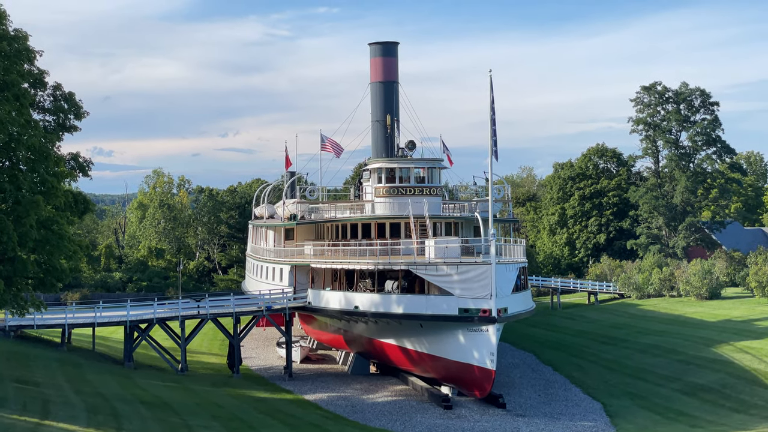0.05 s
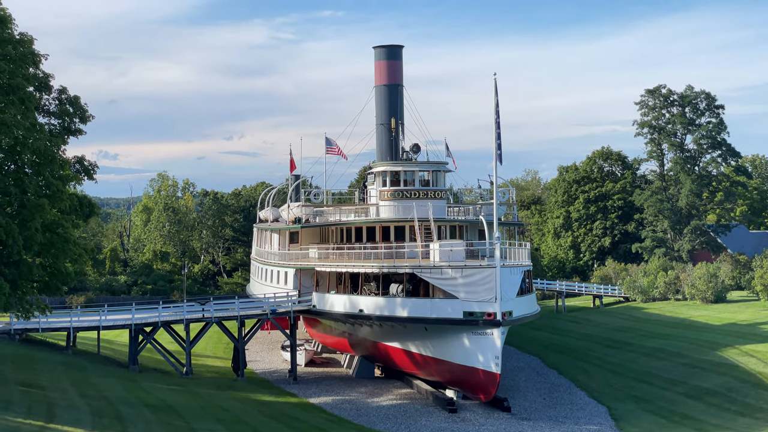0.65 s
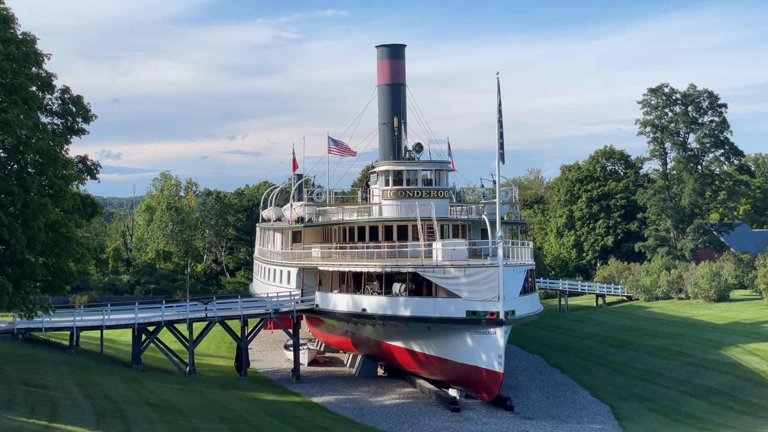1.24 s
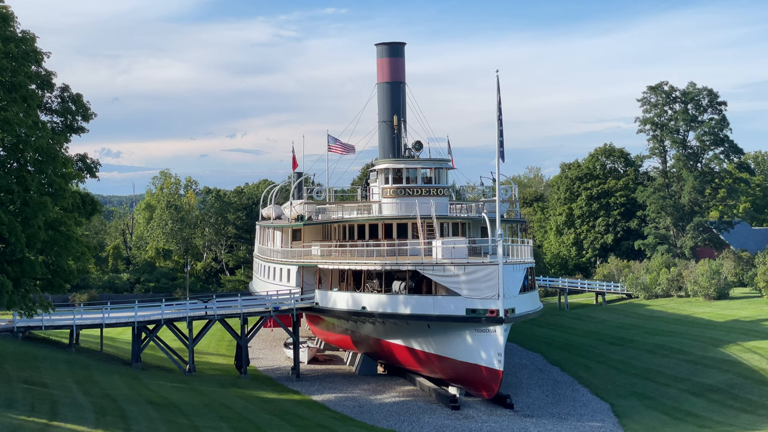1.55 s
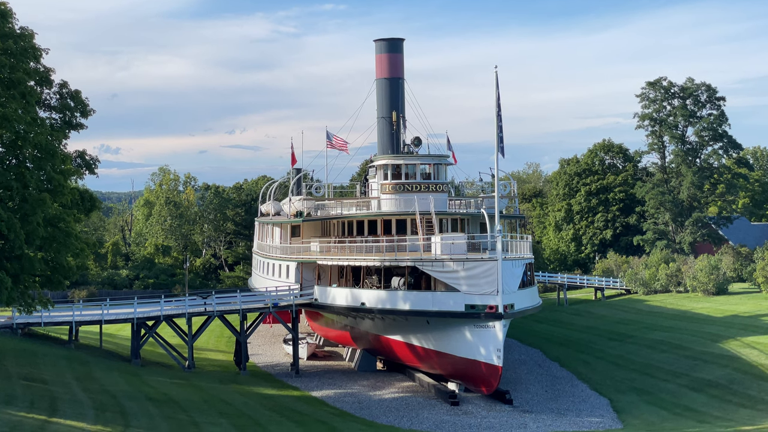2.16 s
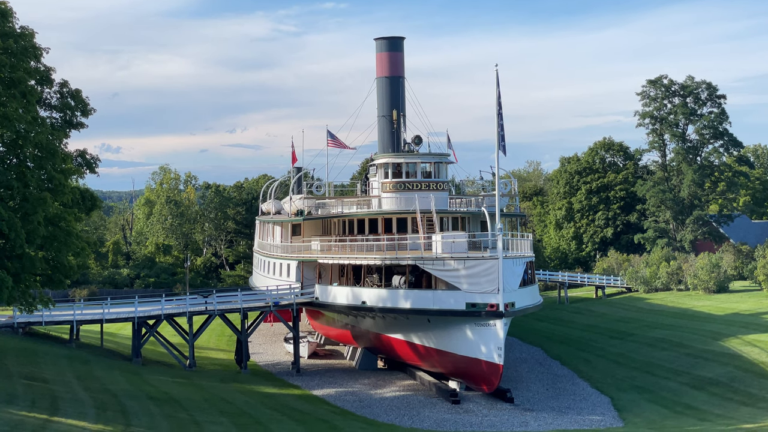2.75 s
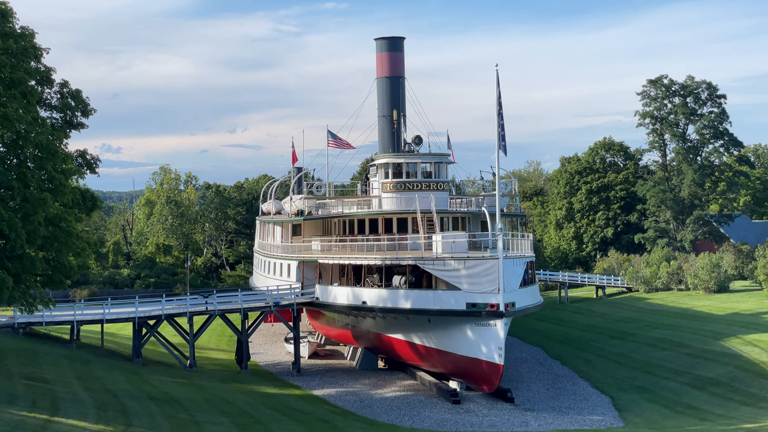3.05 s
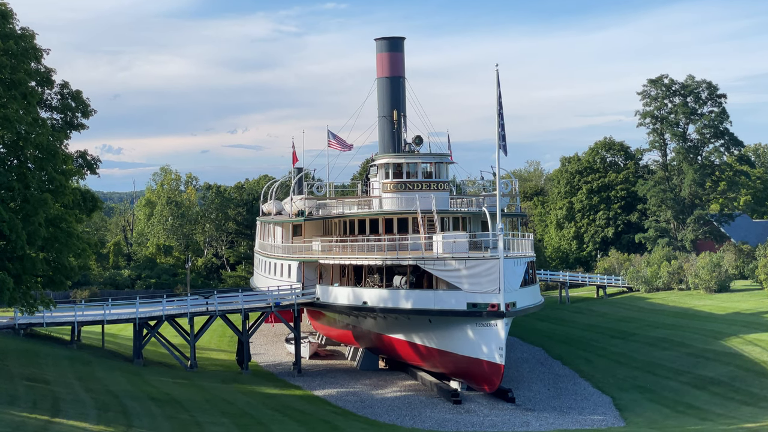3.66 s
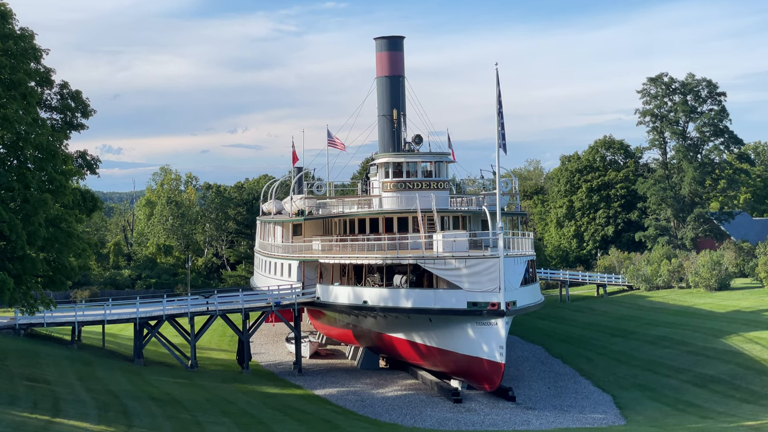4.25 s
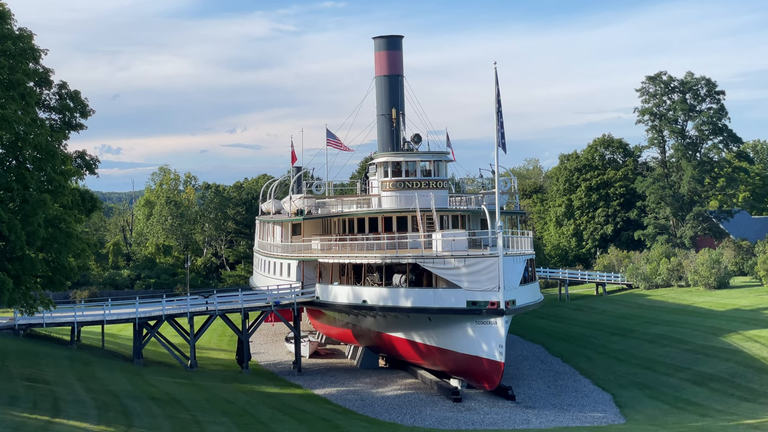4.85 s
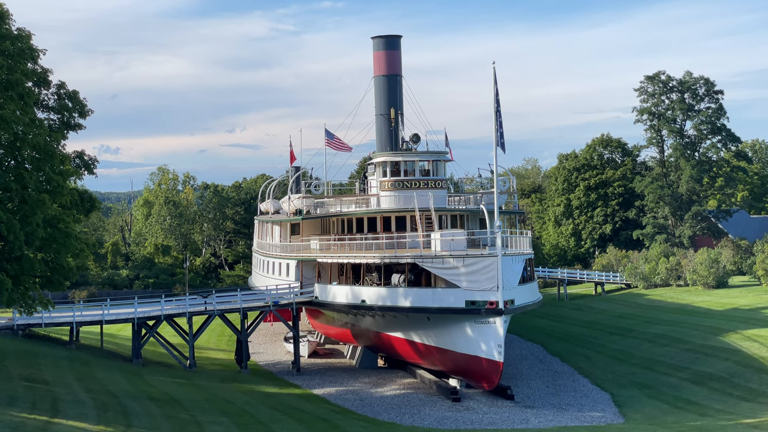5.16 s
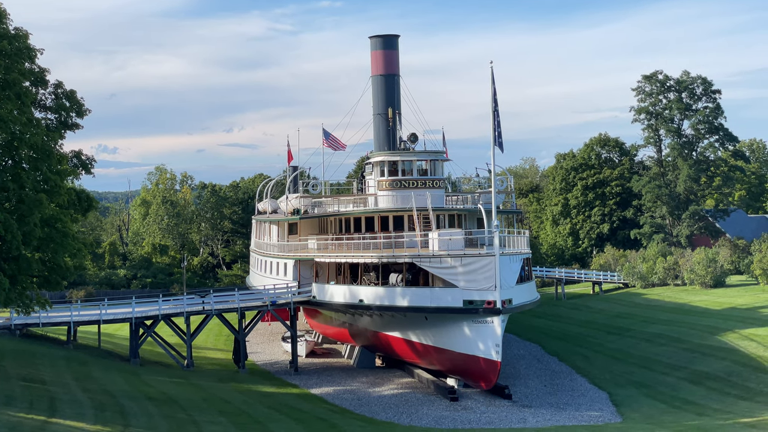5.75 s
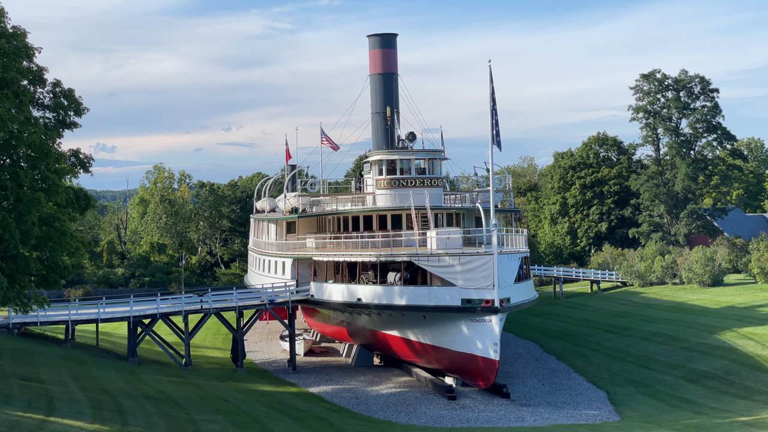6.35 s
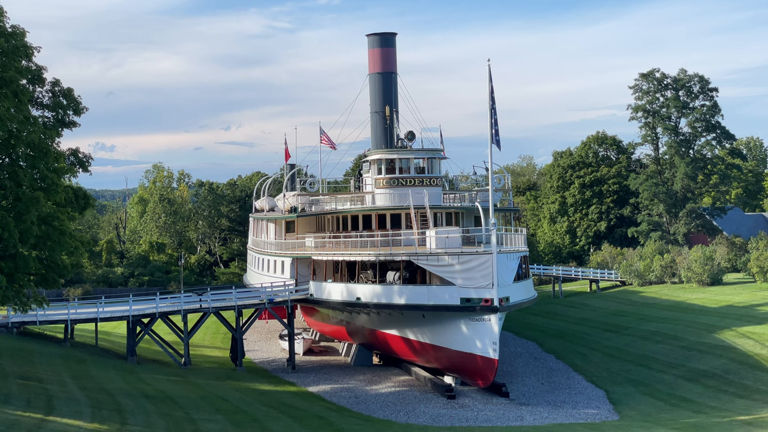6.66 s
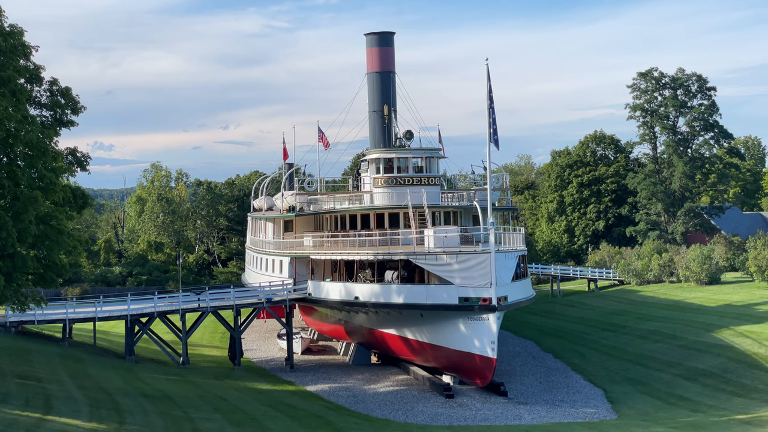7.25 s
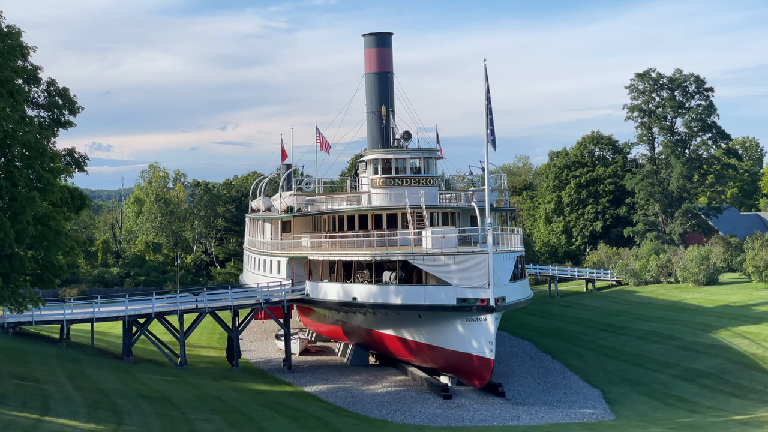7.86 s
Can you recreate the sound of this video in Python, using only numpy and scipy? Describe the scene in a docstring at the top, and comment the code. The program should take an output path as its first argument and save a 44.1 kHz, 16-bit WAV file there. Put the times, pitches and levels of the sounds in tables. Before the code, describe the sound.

From the very start, a steamboat's big whistle is already blowing in an open park: one deep, steady note with a strong low body and weaker overtones, wrapped in a breathy roar and hiss of steam. It is brightest in the first two seconds, then eases slightly as the overtones sink into the rushing steam, while the pitch holds. At about 6.3 seconds the whistle shuts off, and the note and hiss die away within a second. A soft, dull knock comes at about 6.9 seconds. The steam leaves a fading echo, and the low note returns faintly from far trees between 7.1 and 7.6 seconds. From roughly 6.6 seconds to the end at 8 seconds, a few tiny high bird chips and a thin, pulsing cricket are barely audible over a quiet distant rumble and machinery hum.

```python
"""Steam whistle across a park

A steamboat's big whistle, already blowing, holds one deep note: a steam jet drives an air column.
As the pressure sags the overtones sink into the rush of steam. The valve shuts, there is a soft
knock, and the note echoes off far trees. A distant hum, a cricket and a few small birds are left."""
import sys
import numpy as np
from scipy import signal
from scipy.fft import rfft, irfft, next_fast_len
from scipy.io import wavfile

SR = 44100
rng = np.random.default_rng(int(sys.argv[2]) if len(sys.argv) > 2 else 0)


def wrap_up_sound(samples):
    """Save the sound to the file named by the first command line argument, as 16-bit audio."""
    columns = np.atleast_2d(samples).T
    # keep every value between -1 and 1, then stretch to whole-number steps
    tamed = np.clip(columns, -1, 1)
    steps = np.round(tamed * 32767).astype(np.int16)
    wavfile.write(sys.argv[1], SR, steps)


N = 348390
FFT_SIZE = next_fast_len(N)
TIME, FREQS = np.arange(N) / SR, np.fft.rfftfreq(FFT_SIZE, 1 / SR)
SHUT_S = 6.27   # valve starts to close


# Upper air-column harmonics: multiple, level/dB, surge/dB, sag/(dB/s), drop-out/(dB/s)
HARMONICS = [(3, -35, -9, 3.5, -2), (4, -47, 13.5, 0.7, 7.5), (5, -31, -0.9, 2.5, 18),
             (6, -35, 4.5, 2.65, 17.5), (7, -61, 5.5, 1.5, 16), (8, -56, 5.5, 0.5, 16),
             (9, -53, 5, 3.5, 17.5)]

def whistle(phase, octave_db=-34, octave_peak_s=2.15, octave_width_s=3.06, waver_db=1.1):
    """Strong fundamental, weak overtones; most drop out from just before the valve shuts."""
    octave_gain = from_db(octave_db) * .5 ** (((TIME - octave_peak_s) / octave_width_s) ** 2)
    overtones = octave_gain * partial(phase, 2, flutter=0.038)
    failing_s = since(SHUT_S - 0.49)
    for multiple, db, surge_db, sag, dropout in HARMONICS:
        gain = blown(db + waver_db * drift(1) - dropout * failing_s, surge_db, sag)
        overtones += gain * partial(phase, round(multiple), flutter=0.045)
    return fundamental_gain() * partial(phase, 1, flutter=0.0052) + ring_out() * overtones


def whistle_phase(pitch_hz=126.95, sharp_hz=.8, jitter=0.00072):
    """The air column starts sharp and settles; turbulence shakes its pitch slightly."""
    hz = (pitch_hz + sharp_hz * surge()) * (1 + jitter * drift(14))
    return 2 * np.pi * np.cumsum(hz) / SR


def partial(phase, multiple, flutter):
    """One harmonic, rms about 1, wavering slowly in amplitude and phase."""
    angle = multiple * phase + rng.uniform(0, 2 * np.pi)
    return np.sqrt(2) * ((1 + flutter * drift(1.7)) * np.sin(angle) + flutter * drift(4) * np.cos(angle))


def fundamental_gain(echo_s=7.11, echo_db=-42, attack_s=.2, hold_s=.23, release_db_per_s=40):
    """The note holds, rings out, then returns once from far trees."""
    direct = blown(level_db=-8.5, surge_db=0.06, sag_db_per_s=0.434) * ring_out()
    attack = np.minimum(since(echo_s) / attack_s, 1)
    release_db = release_db_per_s * since(echo_s + attack_s + hold_s)
    return np.hypot(direct, attack * from_db(echo_db - release_db))


def ring_out(hang_s=0.037, decay_db_per_s=47):
    """Gain of the air column, which rings on briefly after the valve shuts."""
    return from_db(-decay_db_per_s * since(SHUT_S + hang_s))


def surge(decay_s=1.593):
    """Opening rush of steam, falling from 1 towards 0."""
    return np.exp(-TIME / decay_s)


def blown(level_db, surge_db, sag_db_per_s):
    """Gain of a steam-driven part, following the surge and the sagging boiler pressure."""
    return from_db(level_db + surge_db * surge() - sag_db_per_s * TIME)


def valve(close_db_per_s=41.5, quicken_db_per_s2=24):
    """Gain of the steam supply: open, then closing ever faster."""
    closing_s = since(SHUT_S)
    return from_db(-close_db_per_s * closing_s - quicken_db_per_s2 * closing_s ** 2)


# Smooth jet spectrum: f/Hz, relative level/dB
JET_SPECTRUM = [(40, -26), (130, 14), (215, -2), (280, 6), (350, -9), (410, 4), (550, -2), (900, -1.5),
                (1450, -2), (2000, -0.5), (2900, -7.5), (4100, -11.5), (8000, -22.5), (13500, -30.5),
                (15500, -34.5)]
# Resonances colouring the jet: f/Hz, width/Hz, lift/dB
JET_RESONANCES = [(639, 59, 5.5), (712, 208, 13.5), (945, 20, 10), (1016.6, 64, 11.5), (1148, 96, 10.5),
                  (1265, 113, 8), (1572, 42, 7), (1738, 190, 4), (2200, 170, 5.5), (3390, 810, 5.5),
                  (4940, 910, 2), (6380, 700, 2), (7470, 460, 2.5), (9400, 510, 2.5), (12100, 270, 4)]

def steam(phase):
    """Jet noise in five bands; the jet swings across the lip, so the noise pulses with the note."""
    throat, roar, rush, hiss, fizz = jet_gains()
    lift_db = sum(db * .5 ** ((2 * (FREQS - hz) / width) ** 2) for hz, width, db in JET_RESONANCES)
    colour = spectrum(JET_SPECTRUM) * from_db(lift_db)
    low = throat * noise(colour * below(850))
    high = roar * noise(colour * between(850, 2500))
    high += rush * noise(colour * between(2500, 4000))
    high += hiss * swirl(colour * between(4000, 8500))
    high += fizz * swirl(colour * between(8500, 16000))
    high *= 1 + 0.068 * np.cos(phase) + 0.078 * np.cos(2 * phase)   # two lip crossings per cycle
    return high + low * (1 + 0.25 * np.cos(phase))


# Throat, roar and rush bands: level/dB, surge/dB, sag/(dB/s), flare/dB
LOWER_BANDS = [(-38, 0.8, 0.78, 1.3), (-38, 5.5, 0.35, -1), (-49.5, 10.5, -0.28, 2.5)]
# Hiss band in the breeze: t/s, relative level/dB
HISS_SWAY = [(0.05, -46), (0.79, -45), (1.59, -48), (2.28, -46.5), (2.83, -50.5), (4.35, -52), (5.3, -48.5),
             (5.49, -50.5), (6.25, -50)]
# Fizz band above it: t/s, level/dB
FIZZ_SWAY = [(0.05, -58), (0.65, -56), (1.19, -57), (1.62, -62.5), (2.03, -58), (2.69, -62.5), (3.12, -57),
             (3.42, -59.5), (3.9, -56.5), (4.64, -65.5), (5.14, -55.5), (5.64, -58.5), (6.09, -59),
             (6.25, -61.5)]

def jet_gains(flare_lead_s=0.087, flare_width_s=.22, hiss_trim_db=0.47):
    """Lower bands follow the pressure and the narrowing valve's flare; the treble sways in the breeze."""
    flare = np.exp(-((TIME - SHUT_S + flare_lead_s) / flare_width_s) ** 2)
    lower = [blown(db + flare_db * flare, surge_db, sag) for db, surge_db, sag, flare_db in LOWER_BANDS]
    treble = [from_db(hiss_trim_db + curve(HISS_SWAY)), from_db(curve(FIZZ_SWAY))]
    return [valve() * gain for gain in lower + treble]


def swirl(colour, sway_db=.8):
    """Moving air swells and fades overlapping slices of treble noise; rms 1."""
    bins = rfft(rng.standard_normal(FFT_SIZE)) * colour
    centres_hz, step_hz = np.linspace(3000, 16000, 12, retstep=True)
    windows = [np.maximum(1 - abs(FREQS - hz) / step_hz, 0) for hz in centres_hz]
    slices = [irfft(bins * window, FFT_SIZE)[:N] for window in windows]
    return rms_one(sum(part * from_db(sway_db * drift(1)) for part in slices))


# Close reflection, varying in the breeze: t/s, gain
REFLECTION = [(1.2, 0.098), (2.5, 0.27), (4, 0.36), (6.3, 0.27)]

def with_reflection(x, delay_ms=.86):
    """A slightly later copy carves comb notches into the hiss."""
    band = filtered(x, between(2000, 6500))
    return x + curve(REFLECTION) * np.interp(TIME - delay_ms / 1000, TIME, band)


# Steam leak tones: f/Hz, relative level/dB
LEAK_TONES = [(11876, -85), (12129, -77)]

def squeals(trim_db=-4):
    """Leaking steam: thin tones that rise and fall with the fizz."""
    fizz = jet_gains()[-1]
    return from_db(trim_db) * narrow_tones(LEAK_TONES, width_hz=4) * rms_one(fizz)


# Echo spectrum of the far trees: f/Hz, relative level/dB
TREE_SPECTRUM = [(100, -4), (270, -2), (450, -5), (650, -18.5), (830, 4.5), (1200, -3.5), (1750, 3.5),
                 (2200, -8), (3500, -16.5), (5000, -21), (15000, -40.5)]

def steam_echo(jet):
    """Far trees return the jet noise as a long tail."""
    return scatter(jet, spectrum(TREE_SPECTRUM), t60_s=3.4, delay_s=0.18, trim_db=-12)


def scatter(x, colour, t60_s, delay_s, trim_db):
    """Trees and buildings scatter back a late, decaying tail."""
    response = noise(colour) * from_db(-60 * TIME / t60_s) * (TIME > delay_s)
    response *= np.sqrt(np.mean(colour ** 2)) / np.linalg.norm(response)
    return from_db(trim_db) * signal.fftconvolve(x, response)[:N]


def knock(start_s=6.856, level_db=-35, ring_hz=460, decay_cycles=2):
    """A dull tap that rings for a few cycles as the steam dies away."""
    cycles = ring_hz * since(start_s)
    return from_db(level_db) * np.exp(-cycles / decay_cycles) * np.sin(2 * np.pi * cycles)


# Outdoor background spectrum: f/Hz, relative level/dB
AIR_SPECTRUM = [(25, -26.5), (50, -13), (75, -2), (105, -4.5), (160, -9.5), (250, -14), (400, -8.5),
                (520, -14.5), (660, -24), (830, -16), (1200, -22.5), (1700, -26), (3800, -45.5),
                (5000, -45), (6300, -59), (15500, -68)]

def park_air(level_db=-51):
    """Steady distant rumble and air."""
    return from_db(level_db) * noise(spectrum(AIR_SPECTRUM))


# Machinery tones: f/Hz, level/dB
HUM_TONES = [(80.5, -55.5), (317.6, -61), (398.4, -64.5), (818, -68.5)]

def machinery():
    """Far machinery hums on a few narrow tones."""
    return narrow_tones(HUM_TONES, width_hz=2.5)


# One bird's pairs of falling chips: t/s, level/dB
CHIPS = [(6.641, -77), (7.124, -75), (7.643, -72.5)]
# Other birds' slurs: t/s, length/s, start f/Hz, middle f/Hz, end f/Hz, level/dB
SLURS = [(7.005, .06, 3750, 3940, 3600, -77), (7.212, 0.083, 7200, 7500, 7500, -79)]

def birds(chip_s=.03, pair_lag_s=.046, chip_hz=(4620, 4560, 4030)):
    """Thin whistles on arched pitch curves, with a short echo from the trees."""
    out = np.zeros(N)
    chips = [(s + lag, chip_s, *chip_hz, db) for s, db in CHIPS for lag in (0, pair_lag_s)]
    for s, length_s, start_hz, middle_hz, end_hz, db in chips + SLURS:
        inside = (TIME >= s) & (TIME < s + length_s)
        along = (TIME[inside] - s) / length_s
        hz = np.polyval(np.polyfit([0, .5, 1], [start_hz, middle_hz, end_hz], 2), along)
        angle = 2 * np.pi * np.cumsum(hz) / SR
        out[inside] += np.sqrt(2) * from_db(db) * np.sin(np.pi * along) * np.sin(angle)
    return out + scatter(out, below(9000), t60_s=.45, delay_s=0.021, trim_db=-4)


# Cricket chirp onsets: t/s
CHIRP_STARTS = [6.85, 7.081, 7.367, 7.604, 7.868]

def cricket(pitch_hz=8800, droop_hz=450, strokes_per_s=104, chirp_s=.066, peak_db=-76.48):
    """Each chirp is a run of wing strokes, each sagging in pitch."""
    out = np.zeros(N)
    for s in CHIRP_STARTS:
        inside = (TIME >= s) & (TIME < s + chirp_s)
        stroke = (TIME[inside] - s) * strokes_per_s % 1
        angle = 2 * np.pi * np.cumsum(pitch_hz - droop_hz * stroke ** 2) / SR
        out[inside] += from_db(peak_db) * np.sin(np.pi * stroke) * np.sin(angle)
    return out


def from_db(db):
    return 10 ** (np.asarray(db) / 20)


def rms_one(x):
    return x / np.sqrt(np.mean(x ** 2) + 1e-20)


def since(s):
    """Seconds since s; zero before."""
    return np.maximum(TIME - s, 0)


def curve(points):
    """(t/s, value) points at every sample."""
    return np.interp(TIME, *np.transpose(points))


def spectrum(points):
    """(f/Hz, level/dB) points as a gain per FFT bin."""
    hz, db = np.transpose(points)
    return from_db(np.interp(np.log(FREQS + 1), np.log(hz), db))


def below(hz):
    """Steep low-pass gain."""
    return 1 / np.sqrt(1 + (FREQS / hz) ** 20)


def between(low_hz, high_hz):
    """Steep band-pass gain."""
    return below(high_hz) * np.sqrt(1 - below(low_hz) ** 2)


def filtered(x, gain):
    """Apply a gain per FFT bin."""
    return irfft(rfft(x, FFT_SIZE) * gain, FFT_SIZE)[:N]


def noise(colour):
    """Coloured noise; rms 1."""
    return rms_one(filtered(rng.standard_normal(FFT_SIZE), colour))


def narrow_tones(lines, width_hz):
    """Wavering tones, each a very narrow noise band."""
    return sum(from_db(db) * noise(1 / (1 + ((FREQS - hz) / width_hz) ** 2)) for hz, db in lines)


def drift(rate_hz, hop=100, settle=1000):
    """Slow random wander; rms 1."""
    pole = np.exp(-2 * np.pi * rate_hz * hop / SR)
    white = rng.standard_normal(N // hop + settle + 2)
    slow = signal.lfilter([1], [1, -2 * pole, pole * pole], white)[settle:]
    return np.interp(np.arange(N) / hop, np.arange(len(slow)), rms_one(slow))


def scene():
    """The whistle and its steam over the quiet park; mono."""
    phase = whistle_phase()
    jet = with_reflection(steam(phase))
    echo = steam_echo(jet)
    background = park_air() + machinery()
    return (whistle(phase) + jet + echo + squeals() + knock() + background + birds() + cricket())[None]


def record(dry, cutoff_hz=15700):
    """Steep elliptic low-pass."""
    return signal.sosfilt(signal.ellip(10, .1, 80, cutoff_hz, fs=SR, output="sos"), dry)


dry = scene()
out = record(dry)
wrap_up_sound(out)
```